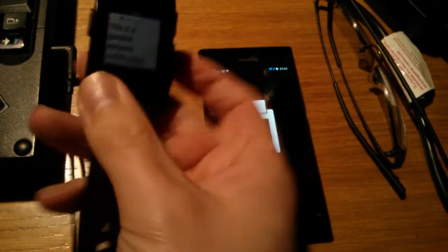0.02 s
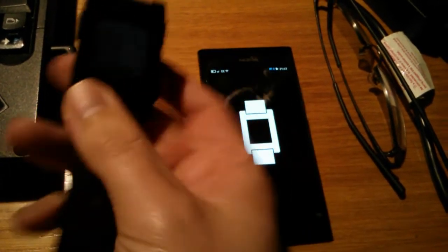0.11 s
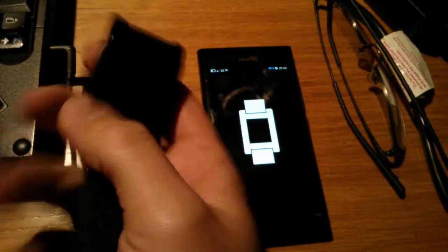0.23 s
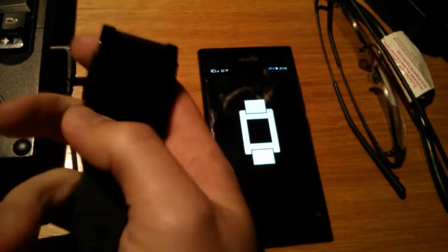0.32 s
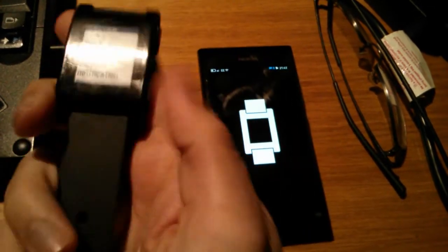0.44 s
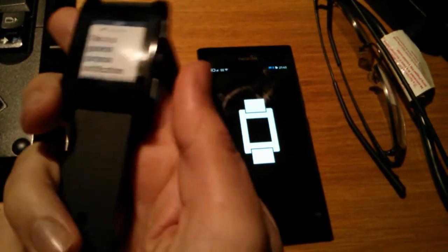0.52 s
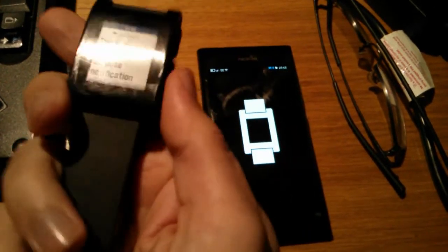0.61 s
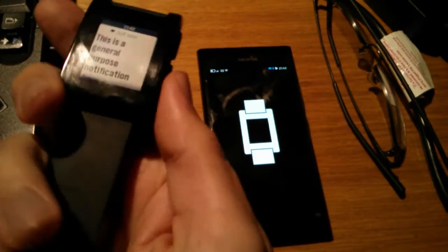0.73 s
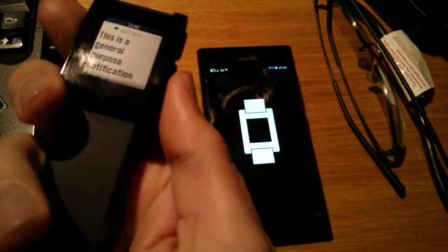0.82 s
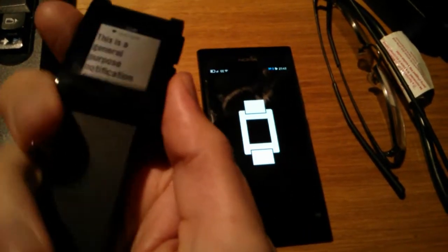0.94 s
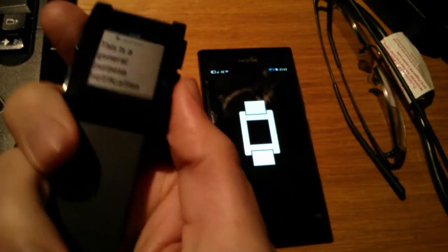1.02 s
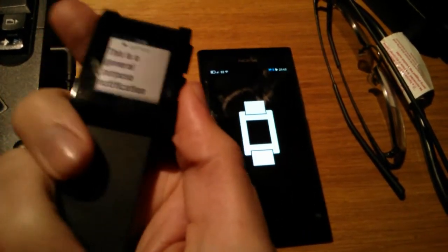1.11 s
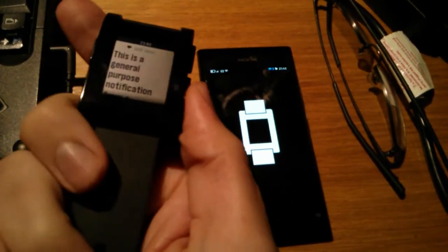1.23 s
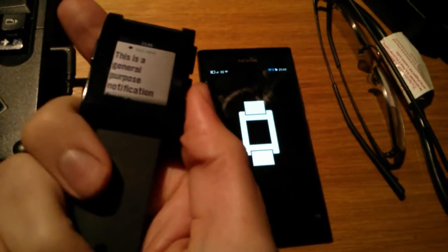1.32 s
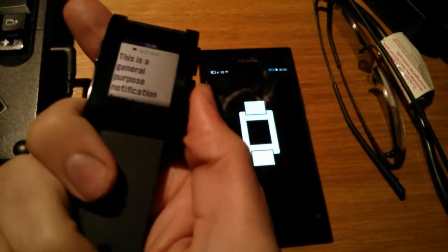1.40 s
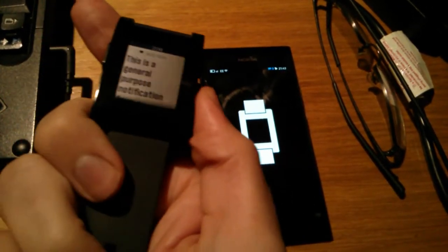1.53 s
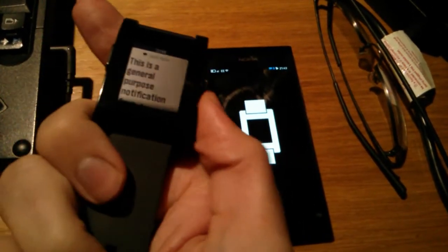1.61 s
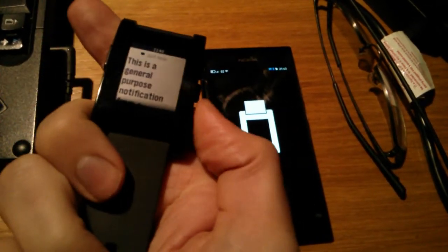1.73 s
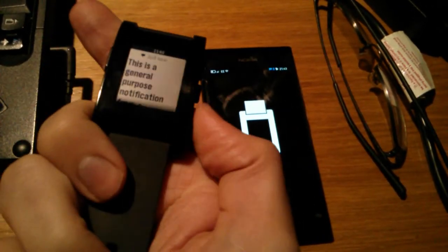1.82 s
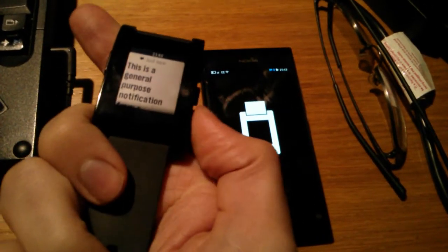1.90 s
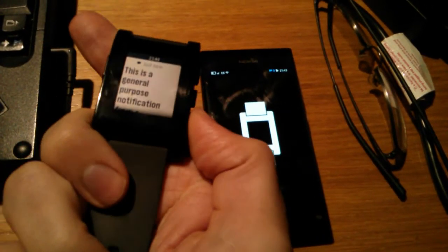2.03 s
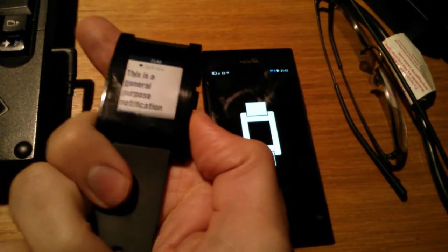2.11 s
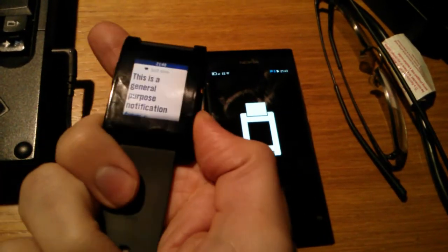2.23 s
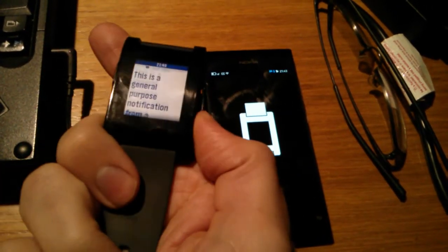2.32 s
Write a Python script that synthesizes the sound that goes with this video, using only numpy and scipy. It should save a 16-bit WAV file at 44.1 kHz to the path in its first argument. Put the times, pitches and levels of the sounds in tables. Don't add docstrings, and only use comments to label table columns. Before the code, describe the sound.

Two crisp plastic snaps from a small watch turned in the hands, after a soft finger tap

```python
import sys
import numpy as np
from scipy import signal
from scipy.fft import rfft, irfft
from scipy.io import wavfile

SR = 44100
rng = np.random.default_rng(int(sys.argv[2]) if len(sys.argv) > 2 else 0)


def to_wav(sig):
    pcm = np.clip(np.atleast_2d(sig), -1, 1) * 32767
    pcm = np.round(pcm).astype(np.int16)
    wavfile.write(sys.argv[1], SR, pcm.T)


def rack_gain(trim_db):
    fader = np.asarray(trim_db, float)
    return 10 ** (fader / 20)


N = 105840

# (time [s], level [dB], brightness [dB per octave])
SNAPS = [
    (.21215, -13, 0.1),
    (.26530, -17, -0.3),
    (.6720, -68, 6.0),
    (2.1939, -65, 10.0),
]
# (frequency [Hz], level [dB], T60 [s])
CASE_MODES = [(370, -21, .05), (440, -21, .045), (655, -21, .04), (820, -26, .045), (950, -18, .045),
              (1150, -24, .04), (1385, -16, .055), (1780, -9, .009), (1925, -24, .12), (2190, -28, .05),
              (2375, -30, .05), (4650, -9, .015), (8800, -6, .003)]
# (delay [s], level [dB], colour [Hz], width [Hz])
DESK_ECHOES = [(.0017, -11, 5000, 2500), (.0028, -7, 6000, 2500), (.0040, -10, 5500, 3000),
               (.0060, -7, 3050, 900), (.00902, -12, 3050, 900), (.0078, -16, 3300, 1500),
               (.0107, -10, 3800, 4000), (.0185, -26, 1700, 600)]
# (frequency [Hz], level [dB])
SCATTER_COLOUR = [(320, -22.5), (900, -22), (1420, -13), (2400, -15), (3300, -11.5), (4700, -11.5),
                  (9000, -12.5), (16000, -44)]
# (frequency [Hz], T60 [s])
ROOM_DECAY = [(300, .15), (800, 0.063), (2000, 0.18), (5500, 0.14), (12000, 0.1)]
# (frequency [Hz], level [dB])
ROOM_COLOUR = [(190, -38.5), (320, -12.5), (1120, -15), (1310, -7), (1740, -9), (1940, -3.5), (2840, -21.5),
               (4780, -8.5), (14000, -23)]
# (time [s], level [dB], length [s])
SCUFFS = [
    (0.1181, -48, 0.0083),
    (.1270, -58, 0.009),
    (.1370, -65, 0.014),
    (0.205, -55.5, 0.005),
]
# (frequency [Hz], level [dB])
SCUFF_COLOUR = [(300, -15), (520, -10), (850, -1), (1150, -9.5), (1850, -1.2), (2700, -15.5), (3400, -16.5),
                (5500, -18.5)]
# (frequency [Hz], level [dB])
SCUFF_TOP = (14500, -23)
# (frequency [Hz], level [dB], T60 [s])
HELD_MODES = [(560, -9.5, .035), (904, -2.5, .045), (1350, -9, 0.031), (1890, 0.4, 0.011),
              (2750, -8.5, 0.013), (3320, -7.5, .02)]
# (time [s], peak level [dB], frequency [Hz])
JOLTS = [
    (1.193, -58, 130),
    (1.222, -53, 78.3),
    (1.985, -60, 45),
]
# (time [s], level [dB], length [s])
RUBS = [
    (-.05, -78, 0.13),
    (0.658, -76.5, .03),
    (1.204, -81, 0.08),
]
# (frequency [Hz], level [dB])
RUB_COLOUR = [(4000, -23), (8000, 1), (13000, -6)]
# (frequency [Hz], level [dB])
RUMBLE_COLOUR = [(20, -10), (43, -1.5), (80, -2), (113, -3.5), (200, -6.5), (240, -21.5), (283, -22.5),
                 (420, -31)]
# (time [s], level [dB])
RUMBLE_SWELL = [(0.0, -69.5), (0.07, -62), (0.17, -75.5), (0.19, -65.5), (0.73, -72.5), (0.74, -68.5),
                (1.52, -67), (1.7, -70.5), (2.36, -63.5), (2.4, -68.5)]
# (time [s], frequency [Hz], level [dB])
FAN_DRIFT = [(0, 141, -71), (.5, 140.5, -74), (1.2, 141, -73), (1.47, 143, -68), (1.68, 144, -77),
             (1.95, 145, -73), (2.12, 145, -65), (2.25, 145, -68), (2.35, 149, -63), (2.4, 150, -67)]
# (frequency [Hz], level [dB])
HISS_COLOUR = [(260, 3), (330, -1.43), (1000, -3.5), (2000, -11), (3100, -18.5), (5000, -12.5), (8000, -9),
               (13500, -6.5)]
# (time [s], lift [dB])
GAIN_LIFT = [(0, 9.5), (.05, 5.5), (.11, 3), (.19, 7.6), (.22, 13.5), (.37, 8.5), (.55, 2.5), (.8, 0.65),
             (1.2, .5), (1.55, 0.55), (1.85, 0.4), (2.05, 0.1), (2.4, 0)]


def evened(x):
    return x / np.sqrt(np.mean(x ** 2) + 1e-20)


def read(points, hz):
    f, value = np.transpose(points)
    return np.interp(np.log(hz + 1), np.log(f + 1), value)


def along(table, column=1):
    rows = np.array(table)
    return np.interp(np.arange(N) / SR, rows[:, 0], rows[:, column])


def add(mix, start_s, sound):
    part = mix[round(start_s * SR):][:len(sound)]
    part += sound[:len(part)]


def coloured(x, points):
    hz = np.fft.rfftfreq(len(x), 1 / SR)
    low_end = (points[0][0] / 2, points[0][1] - 30)
    high_end = (points[-1][0] * 1.5, points[-1][1] - 30)
    return irfft(rfft(x) * rack_gain(read([low_end] + list(points) + [high_end], hz)), len(x))


def tilted(x, tilt_db):
    return coloured(x, [(100, -6 * tilt_db), (6400, 0), (16000, 1.3 * tilt_db)])


def resonate(x, hz, width_hz):
    turn = np.exp(2j * np.pi * np.cumsum(hz * np.ones(len(x))) / SR)
    r = np.exp(-np.pi * width_hz / SR)
    return 2 * (turn * signal.lfilter([1 - r], [1, -r], x / turn)).real


def tail(colour, decay, rise_s):
    noise = coloured(rng.standard_normal(SR // 2), colour)
    hz, t, z = signal.stft(noise, SR, nperseg=128)
    fade = rack_gain(-60 * t / read(decay, hz)[:, None])
    h = signal.istft(z * fade, SR, nperseg=128)[1]
    h = h * np.minimum(np.arange(len(h)) / SR / rise_s, 1)
    return h / np.linalg.norm(h)


def falling_tick(t):
    hz, drop_hz, drop_s = 5200, 5000, .00022
    rise_s, t60 = .00025, .003
    turns = hz * t + drop_hz * drop_s * (1 - np.exp(-t / drop_s))
    envelope = np.minimum(t / rise_s, 1) ** 2 * rack_gain(-60 * t / t60 + 6.5)
    return envelope * np.sin(2 * np.pi * turns)


def case_ring(t):
    return sum(rack_gain(db - 60 * t / t60) * np.sin(2 * np.pi * hz * t) * np.minimum(t * hz, 1)
               for hz, db, t60 in CASE_MODES)


def snaps(room):
    t = np.arange(len(room)) / SR
    sound = falling_tick(t) + case_ring(t)
    for delay, db, hz, width_hz in DESK_ECHOES:
        u = t[:400] * width_hz
        pulse = np.exp(-(2 * (u - 1)) ** 2) * np.sin(2 * np.pi * hz * t[:len(u)])
        add(sound, delay - 1 / width_hz, rack_gain(db) * pulse)
    scatter_t60 = .05
    scatter = tail(SCATTER_COLOUR, [(100, scatter_t60), (200, scatter_t60)], rise_s=.003)
    sound += rack_gain(7.5) * scatter + rack_gain(-1.5) * room
    out = np.zeros(N)
    lead_s = .01
    for s, db, tilt_db in SNAPS:
        add(out, s - lead_s, rack_gain(db) * tilted(np.roll(sound, round(lead_s * SR)), tilt_db))
    return signal.sosfilt(signal.butter(4, 310, "high", fs=SR, output="sos"), out)


def finger_scuffs(room):
    dry = np.zeros(N)
    for s, db, length in SCUFFS:
        noise = evened(coloured(rng.standard_normal(2048), SCUFF_COLOUR + [SCUFF_TOP]))
        arch = np.sin(np.pi * np.minimum(np.arange(len(noise)) / SR / length, 1))
        add(dry, s, rack_gain(db) * noise * arch)
    t = np.arange(4000) / SR
    ring = sum(rack_gain(db - 60 * t / t60) * np.sin(2 * np.pi * hz * t) for hz, db, t60 in HELD_MODES)
    dry = dry + rack_gain(-21) * signal.oaconvolve(np.diff(dry, prepend=0), ring)[:N]
    return dry + rack_gain(-28) * signal.oaconvolve(dry, room)[:N]


def hand_jolts():
    jolts = np.zeros(N)
    for s, db, hz in JOLTS:
        cycles = np.linspace(-2, 2, 4001) * hz / 40
        pulse = np.exp(-(1.68 * cycles) ** 2) * np.sin(2 * np.pi * cycles - .9)
        add(jolts, s - .05, rack_gain(db) * pulse)
    return jolts


def strap_rubs():
    t = np.arange(N) / SR
    shape = sum(rack_gain(db) * np.sin(np.pi * np.clip((t - s) / length, 0, 1)) for s, db, length in RUBS)
    return evened(coloured(rng.standard_normal(N), RUB_COLOUR)) * shape


def room_rumble():
    return evened(coloured(rng.standard_normal(N), RUMBLE_COLOUR)) * rack_gain(along(RUMBLE_SWELL))


def fan_hum():
    hz, width_hz = along(FAN_DRIFT), 10
    fuzz = resonate(resonate(rng.standard_normal(N), hz, width_hz), hz, width_hz)
    tone = np.sqrt(2) * np.sin(2 * np.pi * np.cumsum(hz) / SR)
    return (tone + .6 * evened(fuzz)) * rack_gain(along(FAN_DRIFT, column=2) - 2)


def microphone_hiss():
    lift_db, edge_hz = along(GAIN_LIFT), 15750
    edge = [(edge_hz, HISS_COLOUR[-1][1] + 2), (1.005 * edge_hz, -60)]
    noise = evened(coloured(rng.standard_normal(N), HISS_COLOUR + edge))
    whine = np.sqrt(2) * np.sin(2 * np.pi * 15000 * np.arange(N) / SR)
    return noise * rack_gain(-77 + lift_db) + whine * rack_gain(-82 + .8 * lift_db)


def scene():
    room = tail(ROOM_COLOUR, ROOM_DECAY, rise_s=.03)
    handling = snaps(room) + finger_scuffs(room) + hand_jolts() + strap_rubs()
    return (handling + room_rumble() + fan_hum() + microphone_hiss())[None]


def top_cut(x):
    return signal.sosfilt(signal.butter(12, 16670, fs=SR, output="sos"), x)


def record(dry):
    low_pass = signal.firwin(63, 16100, fs=SR)[None]
    mix = signal.oaconvolve(dry, low_pass, "same")
    return top_cut(mix)


dry = scene()
out = record(dry)
to_wav(out)
```